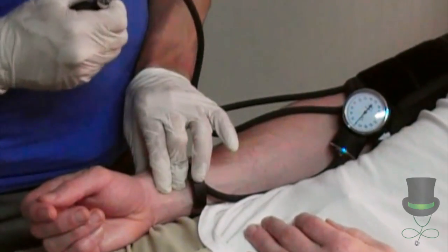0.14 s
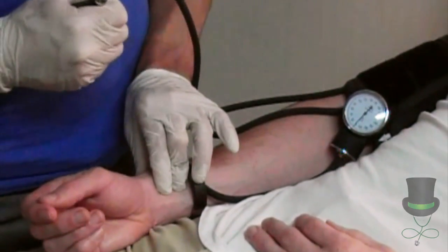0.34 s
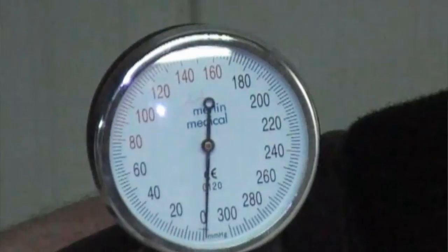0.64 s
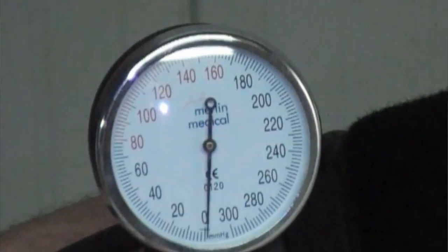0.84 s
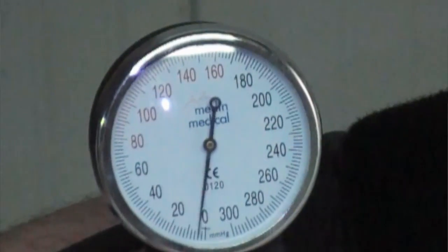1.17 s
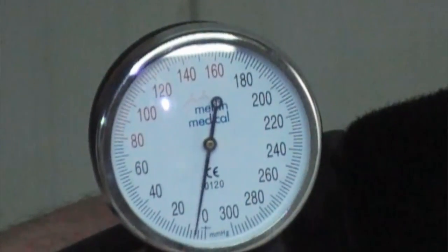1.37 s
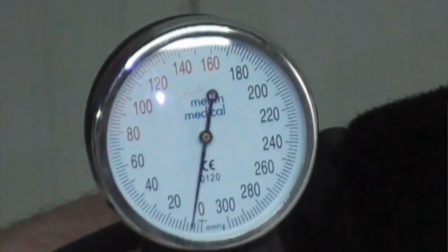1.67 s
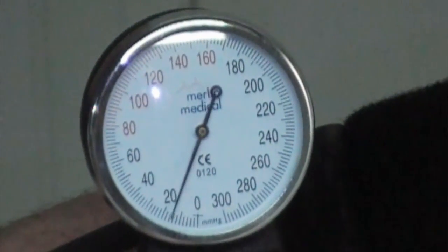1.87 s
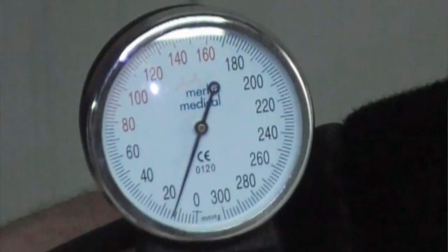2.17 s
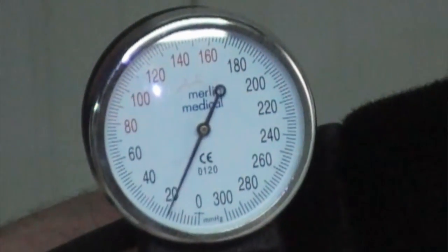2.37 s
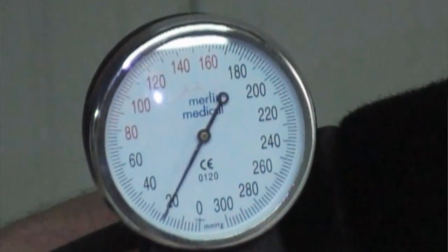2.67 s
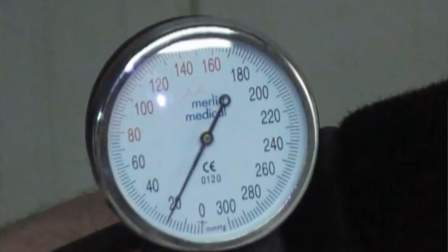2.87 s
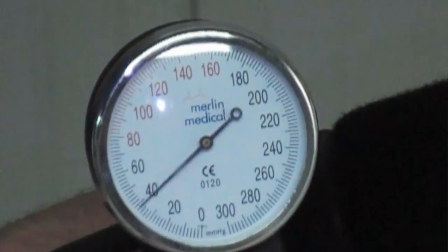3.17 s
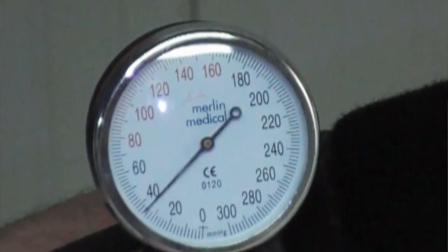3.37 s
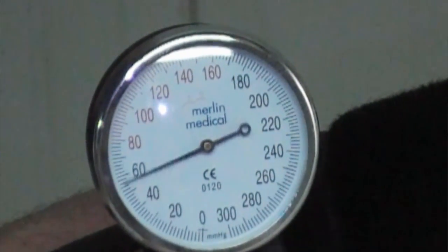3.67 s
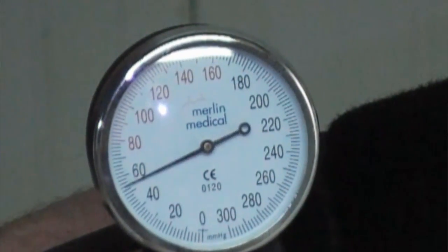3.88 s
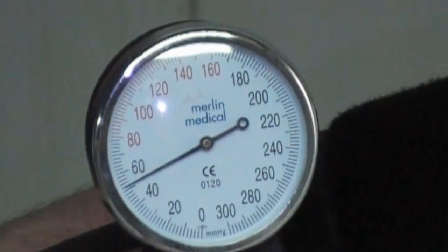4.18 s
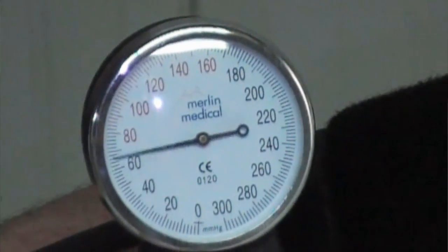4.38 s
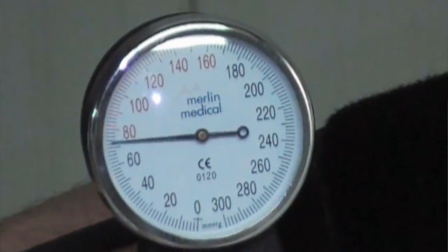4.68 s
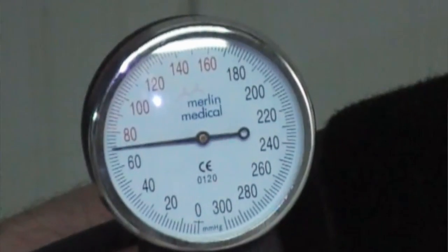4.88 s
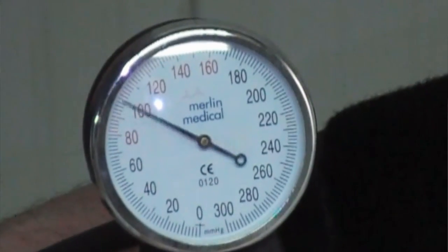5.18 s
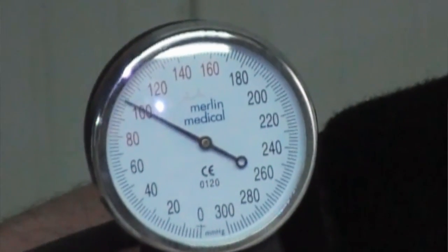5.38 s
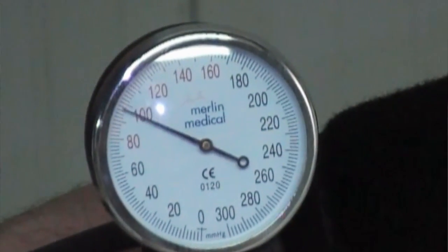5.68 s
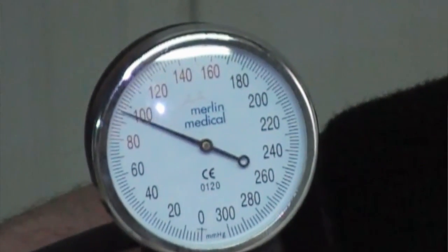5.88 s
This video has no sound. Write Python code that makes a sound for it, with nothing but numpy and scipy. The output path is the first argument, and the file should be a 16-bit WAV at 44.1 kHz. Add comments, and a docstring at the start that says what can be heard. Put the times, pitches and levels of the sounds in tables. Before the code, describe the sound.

Paired puffs of air from a blood pressure bulb: a soft, swelling squeeze with a slightly hollow, chirpy edge, then a sharper sizzling intake. Little plastic and rubber valve clicks punctuate them. The hollow tone fades as the cuff fills, and the last squeeze is almost inaudible. The microphone is close, in a small indoor space with little echo and a low, wavering fan murmur.

```python
"""Hand-pumped arm cuff

A hand pumps the rubber bulb of an arm cuff in a quiet room. Each squeeze is shaped noise from air
driven through valve and tube, with a hollow voice while the cuff is slack. On release the inlet valve
pops open and the bulb refills with a bright jet hiss and a cavity voice. Contacts ring resonant valve
modes, and thin tones are gliding sines. Ventilation (noise and a wavering tone) rumbles beneath."""
import sys
import numpy as np
from scipy import signal
from scipy.fft import rfft, irfft, next_fast_len
from scipy.io import wavfile
from scipy.ndimage import uniform_filter1d, map_coordinates

SR = 44100
rng = np.random.default_rng(int(sys.argv[2]) if len(sys.argv) > 2 else 0)


def generate_wav(signal):
    """Clip the signal to [-1, 1] and save it as 16-bit WAV at the path in sys.argv[1]."""
    frames = np.transpose(np.atleast_2d(signal))
    scaled = np.clip(frames, -1, 1) * 32767
    pcm = np.round(scaled).astype(np.int16)
    wavfile.write(sys.argv[1], SR, pcm)


N = 266143  # samples

# Noise spectra only set relative levels: air() brings its sum to rms 1.
# Ventilation rumble: spectrum (frequency [Hz], density [dB per Hz])
RUMBLE_SPECTRUM = [(20, -28.5), (70, -30), (128, -4), (165, -0.5), (230, -5.5), (271, -13.5), (400, -27)]
# Fan resonance in the rumble: (centre [Hz], width [Hz], lift [dB])
FAN_LIFT = [(172.7, 4.2, 8.5)]
# Rumble level: (time [s], level [dB])
RUMBLE_LEVEL = [(0, -63), (.75, -63), (.88, -55.5), (1.8, -57), (4.5, -60.5), (5.5, -56.5), (5.8, -64),
                (6.03, -56.5)]
# Duct noise: spectrum (frequency [Hz], density [dB per Hz])
DUCT_SPECTRUM = [(200, -24.5), (300, -1), (450, -6), (750, -8.5), (1220, -15.5), (2000, -14), (2150, -27.5),
                 (2500, -45.5)]
# Duct level, fan tone included: (time [s], level of the noise [dB])
DUCT_LEVEL = [(0, -67.5), (3.2, -72.5), (3.9, -72), (4.7, -68.5), (5.3, -69), (5.7, -77)]
# Faint hiss: spectrum (frequency [Hz], density [dB per Hz])
HISS_SPECTRUM = [(1200, -3.5), (2000, 0.5), (9000, -4.5), (12500, -15.5), (15000, -30.5)]
# Hiss level: (time [s], level [dB])
HISS_LEVEL = [(0, -74), (.7, -73), (2.5, -82), (4.6, -79.5), (6.03, -85.5)]
# Stereo width of the background: (frequency [Hz], side minus mid [dB])
ROOM_SIDE = [(60, -12.5), (150, -22.5), (380, -10), (700, -7.5), (2400, -7), (8000, -1)]

# Thin tones between and inside the puffs: (start [s], length [s], pitch [Hz], level before flutter [dB])
STEADY_TONES = [(.84, 0.18, 1473, -74), (1.206, 0.039, 2490, -54), (3.753, 0.2, 1463, -72.5),
                (3.828, 0.21, 1630, -82), (4.262, 0.13, 1485, -64.5), (4.339, .17, 308, -66.5),
                (4.59, 0.076, 423, -77), (5.032, 0.26, 349, -66.5)]
# Valve and rubber ticks: (time [s], peak [dB], centre [Hz], narrowness [dB per octave squared],
# push t60 before low modes lengthen it [s])
TICKS = [(.004, -33.5, 2720, 22, 0.048), (0.4646, -55, 4900, 138, 0.069), (0.7779, -36, 3820, 3.5, .008),
         (1.367, -25.5, 4230, 34, 0.0055), (1.5083, -35, 1750, 4.5, 0.093), (1.513, -33, 13500, 39, 0.085),
         (1.927, -52, 85.4, 29, 0.035), (3.413, -29, 3990, 26.5, 0.0043), (3.4144, -29.5, 4600, 38, 0.0038),
         (3.5572, -49, 600, 1, 0.023), (4.1054, -25.5, 3760, 23, 0.006), (4.1101, -31, 4500, 33, 0.007),
         (4.1146, -38.5, 4340, 33, 0.0066), (4.9224, -45.5, 2093, 147, 0.021),
         (4.9967, -36.5, 8300, 61, 0.037), (4.999, -41.5, 2400, 120, 0.02), (5.998, -52, 8400, 28, .008)]
# Resonant modes of the valve: (frequency [Hz], half-width at half amplitude [Hz], relative level [dB])
VALVE_MODES = [(85.3, 70, 2), (475, 97, 2.5), (1553, 92, -5.5), (2270, 300, -2), (2640, 170, -7.5),
               (3440, 100, -2.5), (4100, 710, -1.5), (4580, 97, -9), (8400, 1400, -6.5), (12600, 820, -2.5)]

# Refills of the bulb: (valve opens [s], rise [s], open for [s], jet [dB], level change while open [dB],
# cavity re jet [dB])
REFILLS = [(-.1, .01, 0.071, -34, 4.5, -0.5), (0.746, .017, 0.14, -32, 0.5, -6),
           (1.266, 0.028, 0.16, -30, -8, -8), (1.742, 0.006, 0.16, -34, -3.3, -6),
           (2.323, 0.02, 0.15, -32.5, -1, -10), (2.92, 0.0045, 0.15, -31, -2, -10),
           (3.549, 0.033, 0.11, -29, -7, -10), (4.232, 0.013, 0.1, -35, -1.5, -13),
           (5.012, 0.015, 0.12, -33.5, -12, -13), (5.914, 0.0056, 0.084, -43, -10.5, -14)]
# Inlet jet: spectrum (frequency [Hz], density [dB per Hz])
JET_SPECTRUM = [(5500, -25), (6400, -11), (7200, -4), (9100, -1.5), (10000, 4.5), (13000, -5.5),
                (14000, -25.5), (15000, -41.5)]
# Bulb cavity: spectrum (frequency [Hz], density [dB per Hz])
CAVITY_SPECTRUM = [(900, -34.5), (1300, -20), (1900, -10), (2400, -6.5), (3290, -0.5), (5180, -4),
                   (8000, -15)]
# The inlet valve's first spit: spectrum (frequency [Hz], density [dB per Hz])
POP_SPECTRUM = [(9000, -12), (12500, 0), (14500, -17.5), (15600, -13)]
# Stereo width of jet and cavity: (frequency [Hz], side minus mid [dB])
JET_SIDE = [(1000, -35.5), (4000, -40.5), (6500, -10.5), (9000, -4.5), (13000, -5)]

# Squeezes of the bulb: (start [s], build-up [s], length [s], flow noise [dB], valve chirp re flow [dB],
# open tube voice re flow [dB], tube opens after [s])
SQUEEZES = [(0.524, 0.11, 0.27, -36, -17.5, -1.5, 0.038), (1.023, 0.11, 0.26, -38, -19, -3, 0.014),
            (1.545, 0.083, .2, -34.5, -14.5, -2, 0.022), (2.077, 0.11, 0.28, -38, -14, -3.5, 0.033),
            (2.665, 0.13, 0.27, -38.5, -28.5, -4, 0.046), (3.33, 0.094, 0.23, -42, -29.5, -4.5, 0.07),
            (4.016, 0.094, 0.22, -44.5, -30.5, 0.5, 0.09), (4.794, 0.059, 0.22, -48, -28, -15.5, .02),
            (5.665, 0.093, 0.3, -70, -26.5, -9.5, 0.022)]
# Flow noise: spectrum (frequency [Hz], density [dB per Hz])
FLOW_SPECTRUM = [(4400, -13), (5200, -6), (6500, -2), (10700, -3.5), (12200, -10.5), (13200, -25),
                 (13900, -45.5)]
# Resonances in the flow noise: (centre [Hz], width [Hz], lift [dB])
FLOW_LIFTS = [(5830, 440, 5), (10900, 510, 2.5)]
# Tube voice: spectrum (frequency [Hz], density [dB per Hz])
TUBE_SPECTRUM = [(1900, -25), (2600, -10), (3200, 4), (3830, -8), (4570, 1.5), (5100, -7.5), (5600, -21)]
# Slack cuff: spectrum (frequency [Hz], density [dB per Hz])
HOLLOW_SPECTRUM = [(550, -32), (860, -13), (1080, -18), (1330, -3), (1650, -5.5), (2000, -2.5),
                   (2800, -15.5), (3300, -41.5)]
# Stereo width of squeeze and pop: (frequency [Hz], side minus mid [dB])
BULB_SIDE = [(1500, -32.5), (4400, -20), (6500, -9.5), (8100, -4.5), (15000, -5.5)]
# Stereo balance of the whole sound: (frequency [Hz], left minus right [dB])
PAN = [(4000, -0.5), (8000, -0.5), (15000, -3)]

PATCH_HZ, PATCH_S = 131, .05  # frequency and time size of random narrow-band level changes in the noise
HUM_HZ, HUM_DB = 845, -9.5  # upper fan tone; mean dB re duct noise
ROOM_T60_S, ROOM_DB = .17, -11.5
TOP_HZ = 15700  # upper band edge

# The outlet valve sings as it cracks open, with a second, steady upper voice (dB re flow)
CHIRP_LATE_S, CHIRP_S, CHIRP_FROM_HZ, CHIRP_TO_HZ = 0.011, .08, 3560, 3200
OVERTONE_HZ, OVERTONE_DB = 6000, -25.5

TICK_RISE_S = 0.0016  # rubber softens each contact
LINGER_HZ = 900  # the push of a mode at this frequency lasts twice as long as at very high ones
# The inlet valve lifts with a knock (dB re cavity; narrowness in dB per octave squared)
KNOCK_LATE_S, KNOCK_RISE_S, KNOCK_T60_S = .003, 0.007, 0.07
KNOCK_DB, KNOCK_HZ, KNOCK_NARROW_DB = 5, 2700, 11

JET_T60_S, CAVITY_T60_S = 0.21, 0.19  # after the valve shuts, before the closing loss
CLOSING_DB_S2 = 1501.5  # the sound dies ever faster as the valve seats
CAVITY_RISE_S, CAVITY_FADE_DB = 0.066, -3.5  # change re jet while the valve is open
SHEEN_HZ, SHEEN_LOSS_DB, SHEEN_T60_S = 11800, 0.33, .15  # top of the jet: from, loss per stroke, extra fade
POP_RISE_S, POP_DB, POP_T60_S = 0.0084, -3.5, 0.08  # dB re jet

RISE_SHAPE, FALL_SHAPE = 2.57, 3.05  # powers of flow that give the sound's amplitude
FLOW_TOP_HZ, FLOW_TOP_POWER = 9500, 0.88  # the treble needs fast flow
TUBE_SHUT_DB, TUBE_OPENS_S = -12.5, .006  # extra level before the tube opens; time it takes to open
# The cuff tightens, so its hollow voice (dB re flow) fades; loss grows as a power of the stroke count
HOLLOW_DB, HOLLOW_LOSS_DB, HOLLOW_POWER, HOLLOW_LEAST_DB = 1.3, 0.98, 2.47, -26


def undb(db):
    """Level law: decibels to amplitude gain."""
    return 10 ** (np.asarray(db) / 20)


def read(table, hz):
    """Interpolation of a (frequency, value) table on a logarithmic frequency axis."""
    at, value = np.transpose(table)
    return np.interp(np.log(hz), np.log(at), value)


def follow(table, t):
    """Level contour: gain interpolated linearly in decibels over time."""
    return undb(np.interp(t, *np.transpose(table)))


def ramp(t, start, length):
    """Linear onset from 0 to 1."""
    return np.clip((t - start) / length, 0, 1)


def walk(rate):
    """Slow random modulation: normal levels drawn about `rate` times a second, joined by ramps."""
    k = int(SR / max(rate, .1))
    held = np.repeat(rng.standard_normal(N // k + 1), k)
    return 0.99 * uniform_filter1d(held, k)[:N]


def patches(shape, tall, long):
    """Random field over frequency and time: `tall` gives patch positions by row, `long` columns a patch."""
    rows, columns = np.meshgrid(tall, np.arange(shape[1]) / max(long, .5), indexing="ij")
    seeds = rng.standard_normal((int(tall[-1]) + 2, shape[1] * 2 + 2))
    return 1.91 * map_coordinates(seeds, [rows, columns], order=1)


def split(x, hz):
    """Complementary band split: the parts below and above a frequency."""
    low = signal.sosfiltfilt(signal.butter(4, hz, fs=SR, output="sos"), x)
    return low, x - low


def air(colour, lifts, side, flicker_db, rate, gust_db, patch_db):
    """Turbulence as stereo noise of rms 1, its level varied at random in broad, narrow and full bands."""
    size = next_fast_len(N)
    hz = np.arange(size // 2 + 1) * SR / size + 1e-3
    db = read(colour, hz)
    for centre, width, lift_db in lifts:
        db = db + lift_db / (1 + (2 * (hz - centre) / width) ** 2)
    gain = undb(db) * (hz > colour[0][0]) * (hz < colour[-1][0])
    mid, diff = rfft(rng.standard_normal((2, size))) * gain
    both = irfft(mid + diff * undb(read(side, hz)) * np.array([[1], [-1]]), size)

    hz, s, frames = signal.stft(both, SR, nperseg=1024, noverlap=768)
    per_s = 1 / s[1]
    broad = patches(frames[0].shape, 3 * np.log2(1 + hz / 60), per_s / rate)  # near third octaves
    narrow = patches(frames[0].shape, hz / PATCH_HZ, per_s * PATCH_S)
    frames = frames * undb(flicker_db * broad + patch_db * narrow)
    out = signal.istft(frames, SR, nperseg=1024, noverlap=768)[1]
    out = out[:, :N] * undb(gust_db * walk(rate * 3))
    return out / np.sqrt(np.mean(out ** 2))


def ventilation():
    """Broadband duct flow: a swelling rumble, duct noise with a wavering fan tone, and a faint hiss."""
    t = np.arange(N) / SR
    rumble = air(RUMBLE_SPECTRUM, FAN_LIFT, ROOM_SIDE, 2.5, 12, 2.9, 0.42) * follow(RUMBLE_LEVEL, t)
    hum_level = undb(HUM_DB + 2.5 * walk(25))
    hum_hz = HUM_HZ * (1 + .012 * walk(70))
    hum = hum_level * np.sin(2 * np.pi * np.cumsum(hum_hz) / SR)
    duct = air(DUCT_SPECTRUM, [], ROOM_SIDE, 1.5, 9, 1.2, 1.8) + hum
    duct = duct * follow(DUCT_LEVEL, t)
    hiss = air(HISS_SPECTRUM, [], ROOM_SIDE, 1.5, 9, 1.2, 1.8) * follow(HISS_LEVEL, t)
    return rumble + duct + hiss


def room(x):
    """Diffuse reverberation: convolution with decaying noise, mostly shared by the two channels."""
    t = np.arange(SR // 4) / SR
    shared, apart = rng.standard_normal((2, len(t))) * np.exp(-np.log(1000) * t / ROOM_T60_S)
    tail = shared + 0.35 * apart * np.array([[1], [-1]])
    tail = tail / np.sqrt(np.sum(shared ** 2))
    return signal.fftconvolve(x, tail, axes=1)[:, :N] * undb(ROOM_DB)


def whistles():
    """Flow-excited tones as fluttering sines: a falling chirp and overtone a squeeze, and steady tones."""
    out, waver, flutter = np.zeros(N + SR), walk(300), walk(250) + 1.87
    tones = []
    for start, _, _, db, chirp_db, _, _ in SQUEEZES:
        s = start + CHIRP_LATE_S
        tones.append((s, CHIRP_S, CHIRP_FROM_HZ, CHIRP_TO_HZ, db + chirp_db))
        tones.append((s, CHIRP_S, OVERTONE_HZ, OVERTONE_HZ, db + OVERTONE_DB))
    tones += [(s, length, hz, hz, db) for s, length, hz, db in STEADY_TONES]
    for s, length, first_hz, last_hz, db in tones:
        i, n = int(s * SR), int(length * SR)
        hz = np.linspace(first_hz, last_hz, n) * (1 + 0.01 * waver[i:i + n])
        swell = undb(db) * np.hanning(n) * flutter[i:i + n]
        out[i:i + n] += swell * np.sin(2 * np.pi * np.cumsum(hz) / SR)
    return out[:N]


def ticks():
    """Modal excitation: noise bursts ring valve modes near each contact's centre; low modes last longer."""
    out, t = np.zeros(N + SR), np.arange(SR // 8) / SR
    rows = [(*row, TICK_RISE_S) for row in TICKS]
    # a softer knock opens each refill that begins after time zero
    for opens, _, _, db, _, cavity_db in REFILLS:
        if opens > 0:
            rows.append((opens + KNOCK_LATE_S, db + cavity_db + KNOCK_DB, KNOCK_HZ, KNOCK_NARROW_DB,
                         KNOCK_T60_S, KNOCK_RISE_S))
    bursts = rng.standard_normal((len(rows), len(t)))
    for (s, peak_db, centre_hz, narrow_db, t60, rise), burst in zip(rows, bursts):
        ring = 0
        for hz, width, db in VALVE_MODES:
            near_db = db - narrow_db * np.log2(hz / centre_hz) ** 2
            mode_t60 = max(t60, .004) * (1 + LINGER_HZ / hz)
            push = burst * ramp(t, 0, rise) * np.exp(-np.log(1000) * t / mode_t60)
            # three equal resonators in series; 2.62 makes up for their narrowing
            mode = np.hstack(signal.iirpeak(hz, hz / width / 2.62, SR))
            ring = ring + undb(near_db) * signal.sosfilt([mode, mode, mode], push) / np.sqrt(width)
        i = int(s * SR)
        out[i:i + len(t)] += ring / abs(ring).max() * undb(peak_db)
    return out[:N]


def refill():
    """Jet noise and cavity resonance: the inlet valve spits open, then jet and bulb sound until it shuts."""
    t, jet, sheen, cavity, pop = np.arange(N) / SR, 0, 0, 0, 0
    for stroke, (opens, rise, length, db, sag_db, cavity_db) in enumerate(REFILLS):
        done = ramp(t, opens, length)
        after = (t - opens - length).clip(0)
        level = undb(db + sag_db * done - CLOSING_DB_S2 * after ** 2) * ramp(t, opens, rise)
        jet_fade_db = -60 * after / JET_T60_S
        jet = jet + level * undb(jet_fade_db)
        # the very top thins stroke by stroke and dies first
        thinning_db = -SHEEN_LOSS_DB * stroke
        sheen = sheen + level * undb(thinning_db + jet_fade_db - 60 * after / SHEEN_T60_S)
        share_db = cavity_db + CAVITY_FADE_DB * done - 60 * after / CAVITY_T60_S
        cavity = cavity + level * ramp(t, opens, CAVITY_RISE_S) * undb(share_db)
        pop_db = db + POP_DB + thinning_db - 60 * abs(t - opens) / POP_T60_S
        pop = pop + ramp(t, opens, POP_RISE_S) * undb(pop_db)
    body, top = split(air(JET_SPECTRUM, [], JET_SIDE, 1.7, 40, 0.53, 3.2), SHEEN_HZ)
    return (jet * body + sheen * top
            + cavity * air(CAVITY_SPECTRUM, [], JET_SIDE, 1.4, 45, 2.2, 3.2)
            + pop * air(POP_SPECTRUM, [], BULB_SIDE, 1.9, 37, 0.99, 1.5))


def squeeze():
    """Flow noise grows as a power of air speed; the slack cuff answers low, mostly near full flow."""
    t = np.arange(N) / SR
    body_gain, top_gain, tube_gain, hollow_gain = np.zeros((4, N))
    for stroke, (start, build, length, db, _, tube_db, late) in enumerate(SQUEEZES):
        # the hand closes and slows smoothly: flow is an arch, steeper in sound than in speed
        full = start + build
        flow = np.sin(np.interp(t, [start, full, start + length], [0, np.pi / 2, np.pi])).clip(0)
        loud = flow ** np.where(t < full, RISE_SHAPE, FALL_SHAPE) * undb(db)
        tube_db = tube_db + TUBE_SHUT_DB * (1 - ramp(t, start + late, TUBE_OPENS_S))
        hollow_db = max(HOLLOW_DB - HOLLOW_LOSS_DB * stroke ** HOLLOW_POWER, HOLLOW_LEAST_DB)
        body_gain += loud
        top_gain += loud * flow ** FLOW_TOP_POWER
        tube_gain += loud * undb(tube_db) * flow ** 1.2
        hollow_gain += loud * undb(hollow_db) * flow ** 2.2
    body, top = split(air(FLOW_SPECTRUM, FLOW_LIFTS, BULB_SIDE, 0.5, 40, 1.5, 3.1), FLOW_TOP_HZ)
    return (body_gain * body + top_gain * top
            + tube_gain * air(TUBE_SPECTRUM, [], BULB_SIDE, 1.8, 40, 1.9, 3.4)
            + hollow_gain * air(HOLLOW_SPECTRUM, [(1380, 400, 3.6)], BULB_SIDE, 0.85, 40, 2.9, 1.9))


def scene():
    """Superposition of the bulb, its reverberation in the room and the ventilation."""
    bulb = squeeze() + refill() + ticks() + whistles()
    return bulb + room(bulb) + ventilation()


def record(dry):
    """Stereo balance and band limit: the right channel is stronger, most so at the top; a low-pass ends it."""
    size = next_fast_len(N)
    pan_db = read(PAN, np.arange(size // 2 + 1) * SR / size + 1)
    tilted = irfft(rfft(dry, size) * undb(np.array([pan_db, -pan_db]) / 2), size)[:, :N]
    return signal.sosfilt(signal.ellip(10, .2, 80, TOP_HZ, fs=SR, output="sos"), tilted)


dry = scene()
out = record(dry)
generate_wav(out)
```